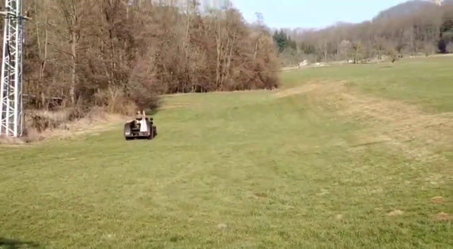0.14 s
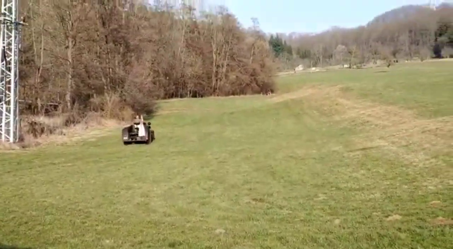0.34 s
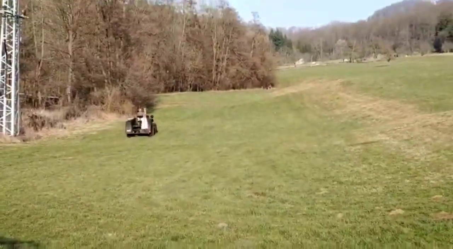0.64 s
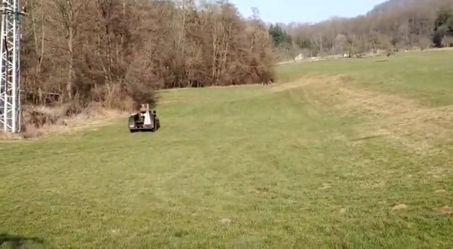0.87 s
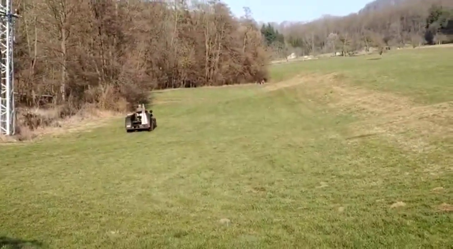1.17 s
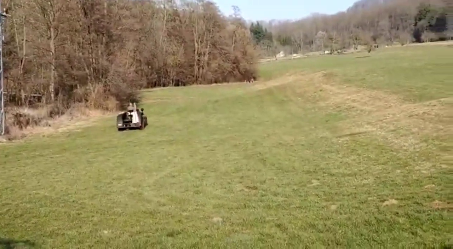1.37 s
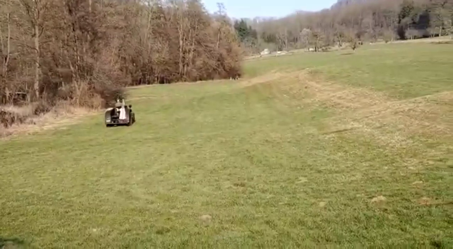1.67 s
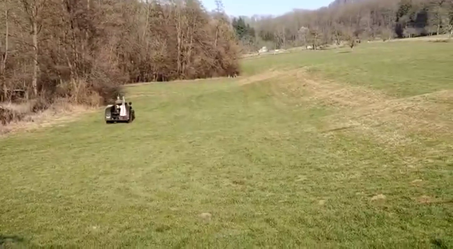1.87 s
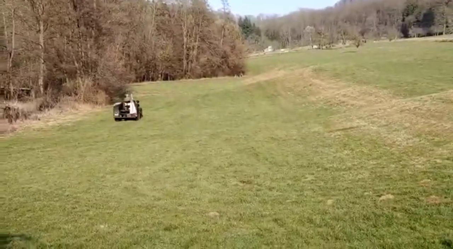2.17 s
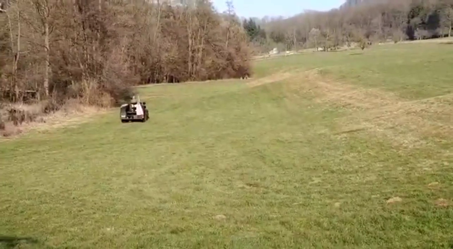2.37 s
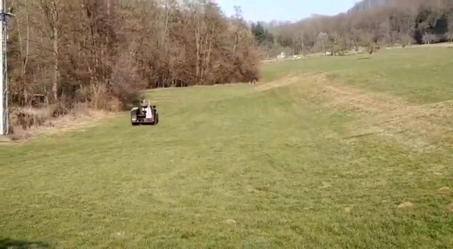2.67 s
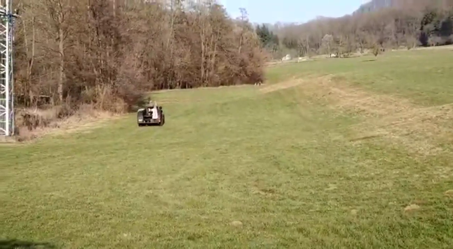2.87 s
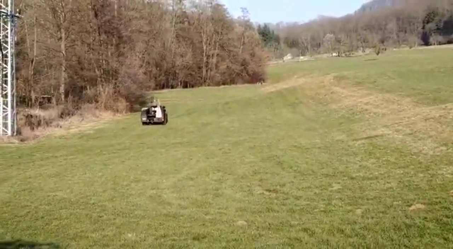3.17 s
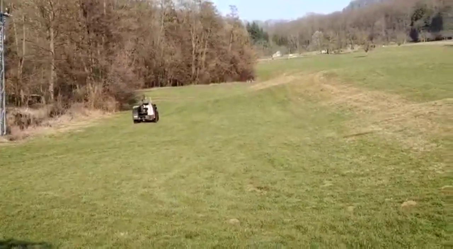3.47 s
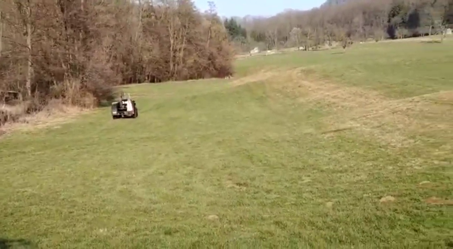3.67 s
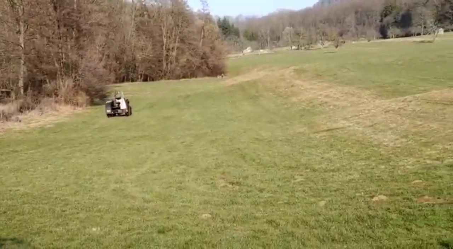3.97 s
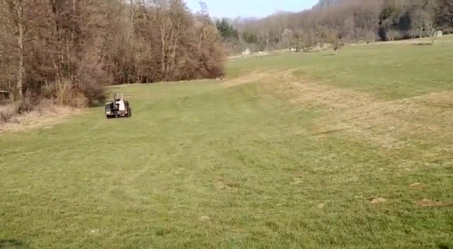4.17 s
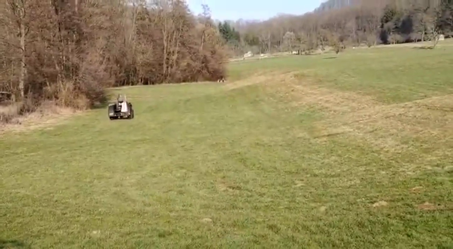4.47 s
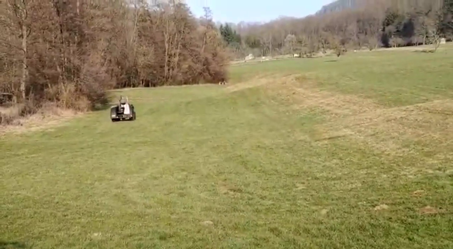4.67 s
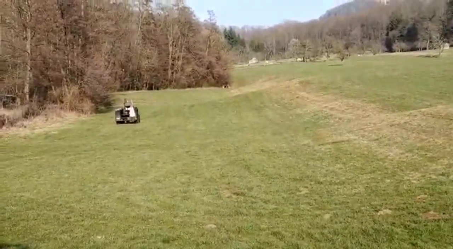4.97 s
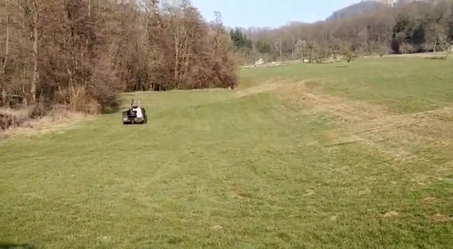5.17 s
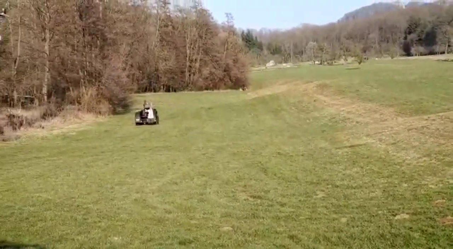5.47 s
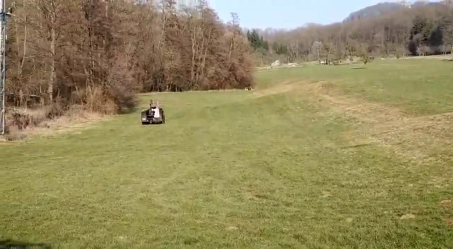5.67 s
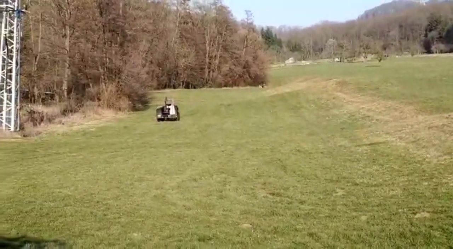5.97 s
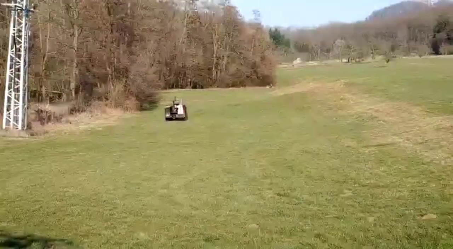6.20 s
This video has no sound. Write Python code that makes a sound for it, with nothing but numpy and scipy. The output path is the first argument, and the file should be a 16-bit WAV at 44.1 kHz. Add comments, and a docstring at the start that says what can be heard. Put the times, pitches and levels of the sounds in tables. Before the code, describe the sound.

The quick, even thumping of an old one-cylinder tractor engine slowly recedes over a field, with a soft woodland echo.

```python
"""In faint outdoor air, an old single-cylinder tractor thuds away over a meadow, about seven beats a second.
After a faint, dull rush, each firing thumps through the silencer, rings the stack and blows out a burst of
gas, over a thin rustle. Near 4.7 s the governor cuts the fuel for two soft beats. A bank and the edge of
a wood throw the beats back to the stereo microphone; twice something ticks close by."""
import sys
import numpy as np
from scipy import signal
from scipy.fft import rfft, irfft, next_fast_len
from scipy.io import wavfile

SR = 44100
rng = np.random.default_rng(int(sys.argv[2]) if len(sys.argv) > 2 else 0)


def output_pcm(signal):
    """Save a mono or channel-first signal as 16-bit PCM at the path in sys.argv[1].

    Samples are clipped to [-1, 1] before scaling.
    """
    pcm = np.clip(np.atleast_2d(signal).T, -1, 1) * 32767
    wavfile.write(sys.argv[1], SR, np.round(pcm).astype(np.int16))


N = 279594
SIZE = next_fast_len(N + 2 * SR)
FREQ = np.arange(SIZE // 2 + 1) * SR / SIZE
TIME = np.arange(N) / SR
LEFT_RIGHT = np.array([[1], [-1]])

# engine speed: t/s, firing rate/Hz
ENGINE_SPEED = [(0.0, 7.427), (0.36, 7.208), (0.67, 7.245), (1.71, 7.037), (2.02, 6.746), (2.87, 6.668),
                (2.91, 6.548), (3.71, 6.504), (4.17, 6.696), (4.66, 6.77), (4.79, 6.32), (5.22, 6.466),
                (6.34, 6.548)]


def amp(db):
    """Decibels to gain."""
    return 10 ** (np.asarray(db) / 20)


def curve(times, points):
    """Value at the given times, on straight lines between (t/s, value) points."""
    return np.interp(times, *np.transpose(points))


def through(x, response):
    """Pass a sound through a frequency response."""
    return irfft(rfft(x, SIZE) * response, SIZE)[..., :N]


def band(hz, width_hz):
    """Response of one resonance, gain 1 at its centre."""
    return 1j * FREQ * width_hz / (hz ** 2 - FREQ ** 2 + 1j * FREQ * width_hz)


def modes(table):
    """Response of several resonances side by side."""
    return sum(amp(db) * band(hz, width) for hz, width, db in table)


def soften(hz):
    """Response of an edge rounded in time: little is left above hz."""
    return 1 / (1 + (FREQ / hz) ** 4)


def colour(points):
    """Response through (f/Hz, level/dB) points."""
    hz, db = np.transpose(points)
    return amp(np.interp(np.log(FREQ + 1), np.log(hz), db))


def noise(response):
    """Coloured noise of rms 1."""
    x = through(rng.standard_normal(N), response)
    return x / np.sqrt(np.mean(x ** 2))


def pulses(times, sizes):
    """One impulse at each time."""
    samples = np.clip(np.round(times * SR).astype(int), 0, SIZE)
    return np.bincount(samples, sizes, N)[:N]


def flow(open_s, rise_s, hold_s, fall_s):
    """Envelope of one burst: it opens after a wait, rises, holds, then dies away."""
    t = np.arange(SR // 10) / SR - open_s
    return np.clip(t / rise_s, 0, 1) * np.exp(-np.maximum(t - rise_s - hold_s, 0) / fall_s)


def puffs(times, db, shape, response):
    """A fresh burst of coloured noise at each time, with energy db."""
    count, size = len(times), len(shape)
    bursts = noise(response)[:count * size].reshape(count, size) * shape
    bursts *= (amp(db) / np.linalg.norm(bursts, axis=1))[:, None]
    sample_times = times[:, None] + np.arange(size) / SR
    return pulses(sample_times.ravel(), bursts.ravel())


def spread(mid, side, wide_hz):
    """Sound from all around the microphone: the bass is alike in both channels, the treble is not."""
    return mid + LEFT_RIGHT * through(side, FREQ / (FREQ + wide_hz))


def air():
    """Faint steady air over the meadow, with little of the deepest bass."""
    # spectrum of the air before its bass cut: f/Hz, relative level/dB
    spectrum = [(18, -26.5), (30, 28), (102, -6.5), (217, -4.5), (286, -21), (623, -15.5), (1080, -23.5),
                (1290, -30), (1620, -28), (4510, -58.5), (12000, -105), (15600, -111), (22000, -120)]
    response = colour(spectrum) * (1 - soften(hz=48))
    return amp(-37.5) * spread(noise(response), noise(response), wide_hz=1200)


def rustle():
    """A thin metallic rustle from the moving tractor comes and goes."""
    # swell of the rustle: t/s, relative level/dB
    swell = [(0.0, -74), (0.53, -77), (0.67, -72), (1.31, -79), (1.59, -74), (1.96, -77), (2.21, -73.5),
             (3.36, -81.5), (4.39, -81.5), (4.66, -89), (4.94, -88), (5.23, -78.5), (5.42, -77),
             (5.85, -83), (6.14, -77.5), (6.34, -67.5)]
    # its spectrum: f/Hz, relative level/dB
    spectrum = [(1000, -1), (3300, 9), (4200, -2), (5200, -7), (6500, -2.5), (7700, -7), (9000, -6),
                (10300, -3.5), (12000, -16.5)]
    return amp(curve(TIME, swell) + 9.5) * noise(colour(spectrum))


def firing_times(first_s=.0245, early_at_s=2.72, early_by_s=.009):
    """One beat for each engine cycle; a single one comes a little early."""
    cycles = np.cumsum(curve(TIME, ENGINE_SPEED)) / SR
    cycles -= np.interp(first_s, TIME, cycles)
    times = np.interp(np.arange(int(cycles[-1]) + 1), cycles, TIME)
    times[np.argmin(np.abs(times - early_at_s))] -= early_by_s
    return times


def fuel_cut(times, start_s=4.466, close_s=.21, end_s=5.09, open_s=.23):
    """The governor closes the fuel, holds it shut and opens it again: 0 is open, 1 is shut."""
    return np.clip(np.minimum((times - start_s) / close_s, (end_s - times) / open_s), 0, 1)


def strength(times, db, per_load, db_per_s, cut_db, scatter_db):
    """Level of each beat in dB: it follows the load, the drive away and the fuel cut, with scatter."""
    # how hard the engine pulls: t/s, load/dB
    load = [(0, -1.5), (.3, -2.5), (.44, 2.5), (1.3, -2), (1.85, -4), (2.65, 0), (3.2, -1.5), (3.7, -5),
            (4.4, -8), (5.16, -1), (6.34, 1)]
    trend_db = db + per_load * curve(times, load) + db_per_s * times
    return trend_db + cut_db * fuel_cut(times) + scatter_db * rng.standard_normal(len(times))


def lead_in(times, lead_s=.011):
    """A faint, dull rush of midrange noise just before each beat; weaker without fuel."""
    # the rush: level/dB, dB per dB of load, drift/(dB/s), fuel shut/dB, scatter/dB
    rush_law = (-18, .3, -.3, -10, 0)
    shape = flow(open_s=.001, rise_s=.0037, hold_s=.0067, fall_s=.012)
    dull = band(hz=1440, width_hz=1500) ** 2 * soften(hz=3000)
    return puffs(times - lead_s, strength(times, *rush_law), shape, dull)


def silencer(slug_hz, edge_hz, mouth_hz=44, mouth_width_hz=41.2):
    """Response to a slug of gas: the silencer rings; the small pipe mouth radiates little deep bass."""
    # silencer resonances: f/Hz, width/Hz, relative level/dB
    resonances = [(88.1, 23.9, 45), (145.9, 28.1, 39.5)]
    slug = soften(edge_hz) / (1 + 1j * FREQ / slug_hz) ** 2
    mouth = (band(mouth_hz, mouth_width_hz) * 1j * FREQ / mouth_width_hz) ** 2
    return slug * modes(resonances) * mouth


def thumps(times, db, hard_stroke):
    """Firings thump hard; without fuel the piston only pushes air out, a rounder, later stroke."""
    fired = fuel_cut(times) < .7
    hard = through(pulses(times, amp(db) * fired), hard_stroke)
    soft = through(pulses(times, amp(db + 4.5) * ~fired), silencer(slug_hz=70, edge_hz=117))
    return hard + soft


def bark(times, db, crack_db, rasp_db):
    """A pressure front rings the stack, then turbulent gas barks, cracks and rasps in the pipe."""
    # stack resonances struck by the front: f/Hz, width/Hz, relative level/dB
    stack = [(598.7, 51.5, 25.5), (885, 360, 0.5), (1030, 420, -2), (1460, 320, 0)]
    # the bark, gas in the lowest stack resonances: f/Hz, relative level/dB
    gas_spectrum = [(120, -5), (290, -18), (420, -14), (540, 1.5), (680, 0.5), (900, -4), (1120, -15.5),
                    (1400, -22), (2500, -49), (8000, -78)]
    # the crack, gas in the middle resonances: f/Hz, relative level/dB
    crack_spectrum = [(500, -37.5), (1100, -19.5), (1350, -6.5), (1620, 1.5), (1850, -6.5), (2120, -12),
                      (2550, -11.5), (2900, -26), (3700, -41), (8000, -66)]
    front = through(pulses(times, amp(db - 2.5)), modes(stack) * soften(hz=1950))
    blowdown = flow(open_s=.0004, rise_s=.0058, hold_s=.0036, fall_s=.0048)
    gas = puffs(times, db + 5, blowdown, colour(gas_spectrum))
    crack = puffs(times, crack_db - .5, blowdown, colour(crack_spectrum))
    rasp_flow = flow(open_s=.0018, rise_s=.0031, hold_s=.004, fall_s=.0061)
    rasp = puffs(times, rasp_db - 15.5, rasp_flow, band(hz=3120, width_hz=420) ** 2)
    return front + gas + crack + rasp


def hiss(times, db, scatter_db):
    """The jet through the narrow port excites the high pipe resonances, a new mix at every firing."""
    # high pipe resonances: f/Hz, nominal width/Hz, relative level/dB
    whistles = [(3750, 520, 1), (4350, 180, -5), (5135, 240, -4), (5950, 700, -4), (6600, 330, -7.5),
                (7820, 320, -11), (8700, 350, -10.5), (9820, 900, -6)]
    shape = flow(open_s=.0019, rise_s=.0012, hold_s=.0012, fall_s=.0068)
    scatter = scatter_db * rng.standard_normal((len(times), len(whistles))).T
    jet = sum(puffs(times, db + mode_db + chance_db, shape, band(hz, 2 * width) ** 2)
              for (hz, width, mode_db), chance_db in zip(whistles, scatter))
    return amp(-21.5) * jet


def wood(exhaust, spectrum, delay_s, t60_s, wide_hz, places=4):
    """Countless trunks scatter the beats; the pattern changes from place to place along the way."""
    t = np.arange(3 * SR // 2) / SR - delay_s
    fade = (t > 0) * amp(-60 * np.abs(t) / t60_s)
    fade /= np.linalg.norm(fade)
    beats = through(exhaust, colour(spectrum))
    # the engine has been running for a while, so the wood already rings with four earlier beats
    lead = int(4 * SR / curve(.3, ENGINE_SPEED))
    beats = np.concatenate([beats[:lead], beats])
    position = np.linspace(0, places - 1, len(beats))
    mid_side = 0
    for place in range(places):
        share = np.sqrt(np.clip(1 - np.abs(position - place), 0, 1))
        trunks = fade * rng.standard_normal((2, len(t)))
        mid_side += signal.fftconvolve([beats * share], trunks, axes=1)[:, lead:lead + N]
    return spread(*mid_side, wide_hz)


def near_echoes(times, db, stroke, start_db, end_db):
    """Each reflector returns its own band of the thump; the echoes slide and weaken along the way."""
    # bank and wood: first delay/s, last delay/s, signed relative strength, favoured f/Hz
    reflectors = [(0.0307, .0345, -0.46, 242), (0.0318, .0333, 2.5, 242), (0.034, 0.013, -0.16, 62),
                  (0.0412, 0.04206, 1.97, 235.4), (0.049, 0.05496, 0.2648, 156.2),
                  (0.0556, .0556, 0.67, 196), (0.061, 0.0676, -0.4642, 119.8),
                  (0.0672, .066, -0.2059, 133.3)]
    way = times * SR / N
    sizes = amp(db + start_db + (end_db - start_db) * way)
    returned = 0
    for first_s, last_s, gain, hz in reflectors:
        arrivals = pulses(times + first_s + (last_s - first_s) * way, sizes)
        returned += gain * rfft(arrivals, SIZE) * band(hz, hz / 2) ** 2
    # soft ground swallows the low mids on the longer path
    grass = 1 - band(hz=281, width_hz=56.7).real
    return irfft(returned * stroke * grass, SIZE)[:N]


def accents(times, within_s=.05):
    """Single firings stand out: their extra bark and hiss, in dB."""
    # accented firings: t/s, extra bark/dB, extra hiss/dB
    accented = [(.713, 0.5, -0.5), (.99, 3, -1), (2.131, 2, 1.5), (2.279, 2.5, -1.5), (2.578, 2.5, 0),
                (3.182, 2.5, 3.5), (6.238, 3, 2)]
    when, bark_db, hiss_db = np.transpose(accented)
    hit = np.abs(times[:, None] - when) < within_s
    return hit @ bark_db, hit @ hiss_db


def ticks():
    """Two tiny bright ticks close to the microphone."""
    # dry ticks: t/s, relative level/dB
    events = [(1.224, -35), (4.898, -35)]
    times, db = np.transpose(events)
    return through(pulses(times, amp(db)), band(5900, 3000) ** 2 + band(8600, 1800))


def microphone(direct):
    """The treble reaches the two microphone ports out of step."""
    # side signal between the ports: f/Hz, level against mid/dB
    ports = [(60, -26), (190, -49.5), (350, -16.5), (620, -19), (1120, -8), (2000, -6), (3600, 2),
             (6000, -2), (8000, -20), (11600, -6)]
    return direct + LEFT_RIGHT * through(direct, 1j * colour(ports))


def scene():
    """From a fixed spot on the meadow: the tractor straight across the grass, its echoes and the air."""
    # parts of a beat: relative level/dB, dB per dB of load, drift/(dB/s), fuel shut/dB, scatter/dB
    thump_law = (2.5, -0.04, -0.3469, -6.5, 0.36)
    bark_law = (-1.5, 0.14, -0.7138, -19, 2.72)
    crack_law = (-0.4, 0.18, -1.2161, -28.5, 1.32)
    rasp_law = (-4, 1.2, 0.07, -25, 0.4)
    hiss_law = (-4, 1.1, -1.45, -30, 1.)
    # swell of bark and crack alike: t/s, level/dB
    midrange = [(0, 0.5), (.5, -2), (1.7, -0.5), (2.2, 1.5), (2.7, 1.5), (3.3, -0.5), (4.3, 0.5),
                (5.3, -1.5), (6.34, 0.5)]
    # what the nearest trees and the depth of the wood return: f/Hz, level/dB
    near_trees = [(100, -17.5), (300, -18.5), (600, -17), (1200, -13), (1700, -18.5), (2500, -13.5),
                  (3200, -18.5), (4200, -12), (9000, -39.5)]
    far_trees = [(40, -24.5), (80, -28), (120, -10.5), (200, -3), (300, -6.5), (550, -15), (800, -11.5),
                 (1200, -5), (1700, -16.5), (2500, -13.5), (4000, -21), (9000, -27)]

    times = firing_times()
    laws = thump_law, bark_law, crack_law, rasp_law, hiss_law
    thump_db, bark_db, crack_db, rasp_db, hiss_db = (strength(times, *law) for law in laws)
    mid_db = curve(times, midrange)
    more_bark_db, more_hiss_db = accents(times)
    hard_stroke = silencer(slug_hz=99.2, edge_hz=271)
    exhaust = thumps(times, thump_db, hard_stroke)
    exhaust += bark(times, bark_db + mid_db + more_bark_db, crack_db + mid_db, rasp_db)
    exhaust += hiss(times, hiss_db + more_hiss_db, scatter_db=3)
    echoes = near_echoes(times, thump_db, hard_stroke, start_db=4, end_db=-3)
    foreground = microphone(rustle() + lead_in(times) + exhaust + echoes + ticks())
    edge = wood(exhaust, near_trees, delay_s=.023, t60_s=.22, wide_hz=800)
    depth = wood(exhaust, far_trees, delay_s=.06, t60_s=2.1, wide_hz=900)
    return foreground + edge + depth + air()


def record(dry):
    """The left channel is slightly weaker; the deepest bass and the top are cut."""
    bottom_hz, top_hz, balance_db = 29, 11900, -.5
    lowpass = signal.ellip(6, .3, 60, top_hz, fs=SR, output="sos")
    low_cut = 1 - soften(bottom_hz)
    return signal.sosfilt(lowpass, through(dry, low_cut) * amp(LEFT_RIGHT * balance_db / 2))


dry = scene()
out = record(dry)
output_pcm(out)
```